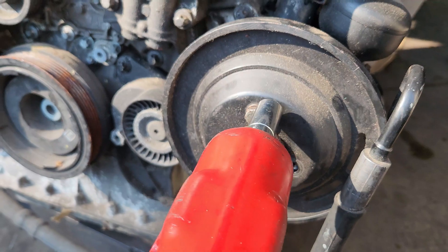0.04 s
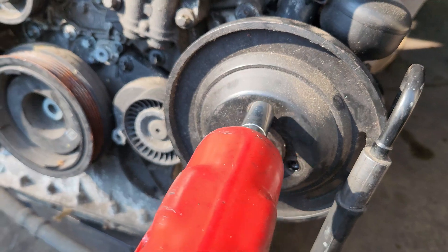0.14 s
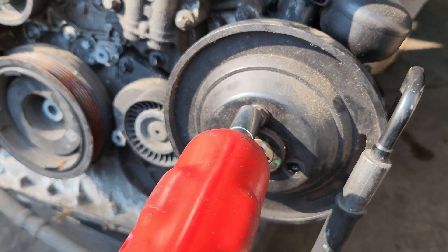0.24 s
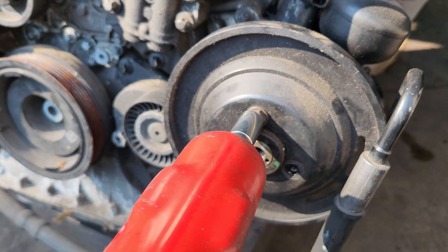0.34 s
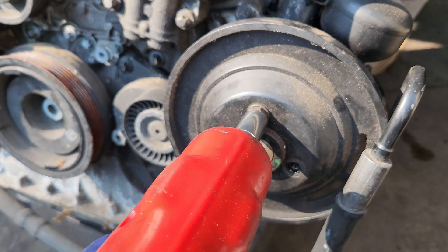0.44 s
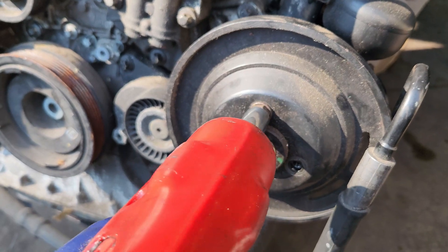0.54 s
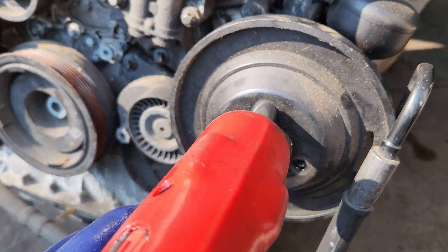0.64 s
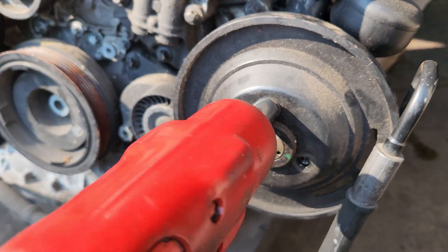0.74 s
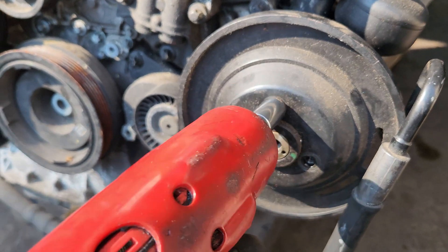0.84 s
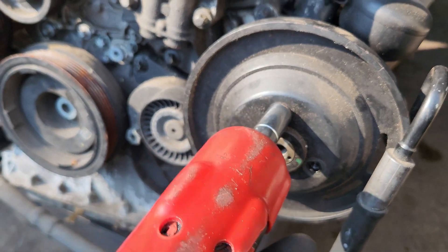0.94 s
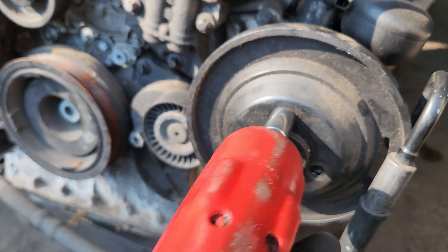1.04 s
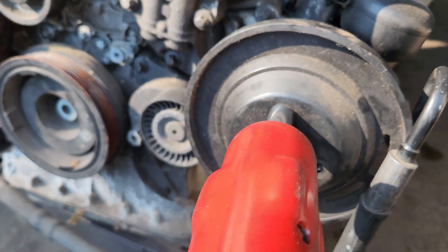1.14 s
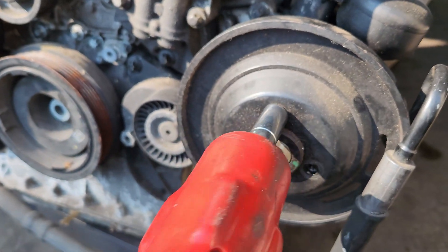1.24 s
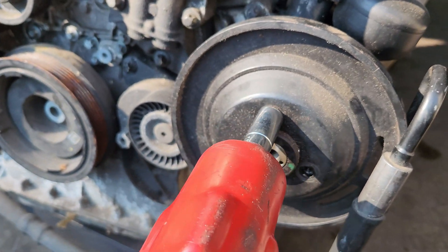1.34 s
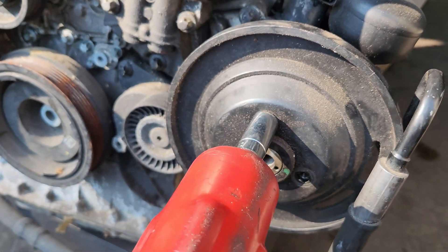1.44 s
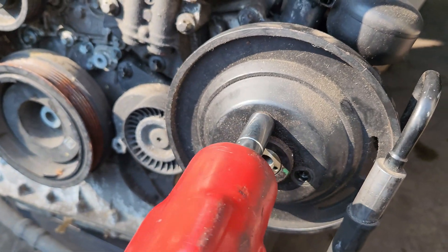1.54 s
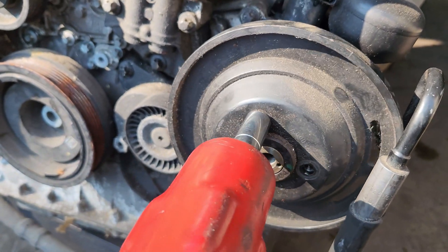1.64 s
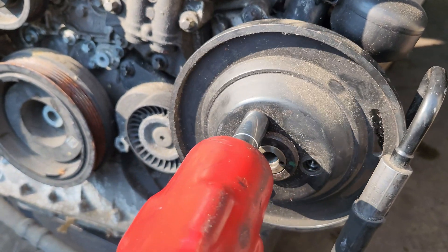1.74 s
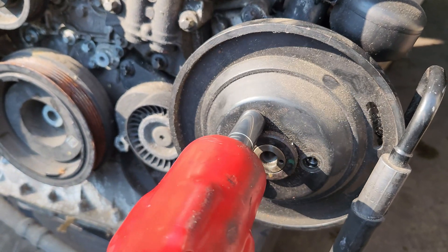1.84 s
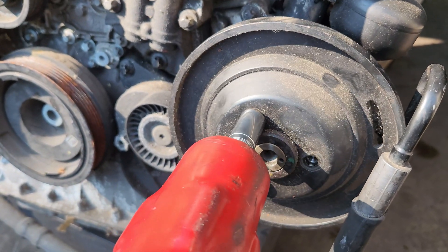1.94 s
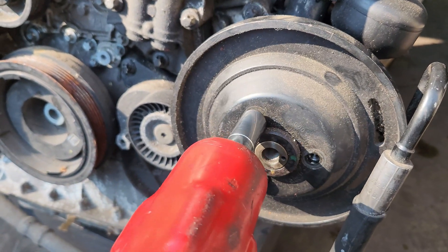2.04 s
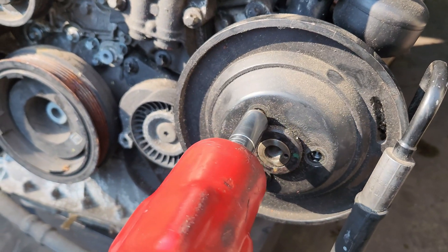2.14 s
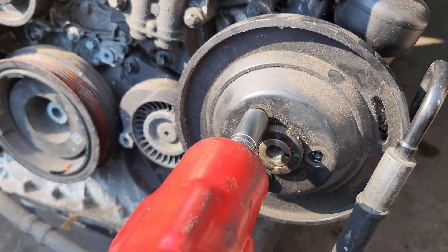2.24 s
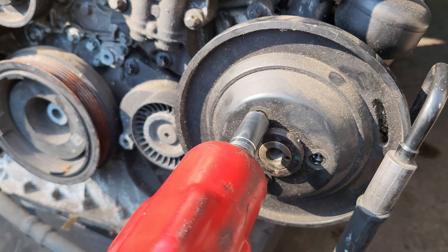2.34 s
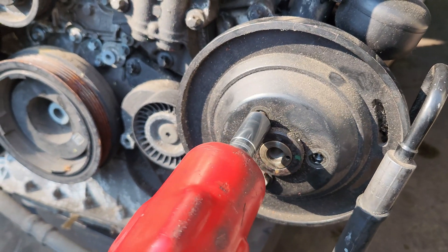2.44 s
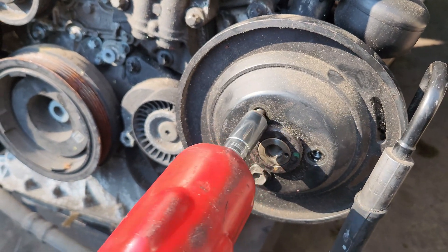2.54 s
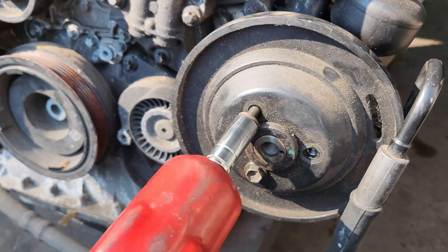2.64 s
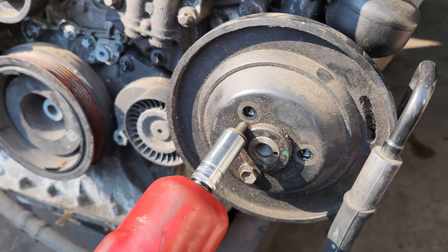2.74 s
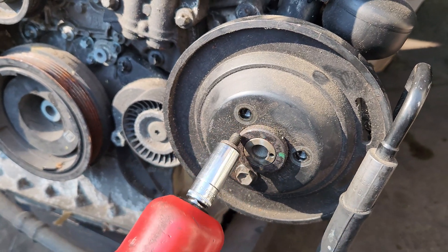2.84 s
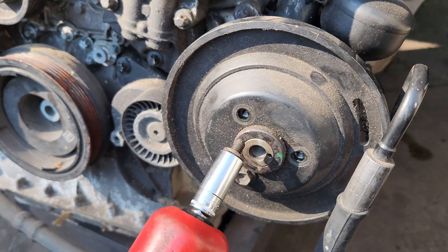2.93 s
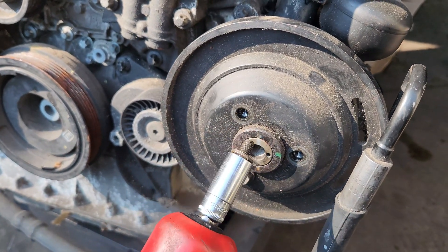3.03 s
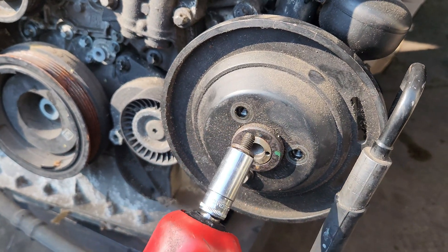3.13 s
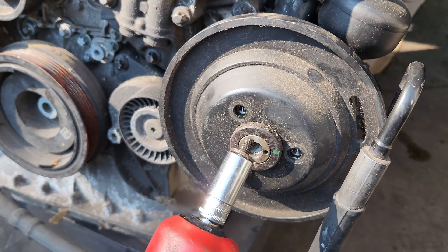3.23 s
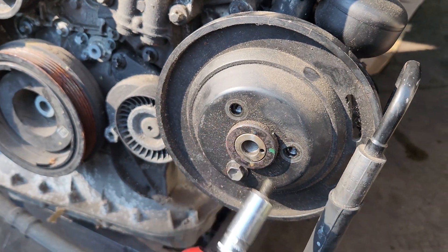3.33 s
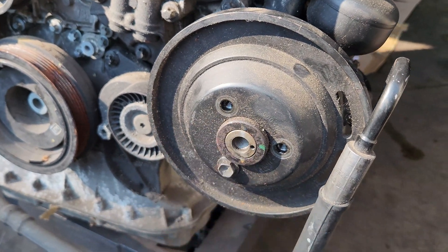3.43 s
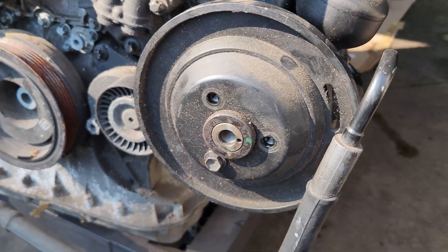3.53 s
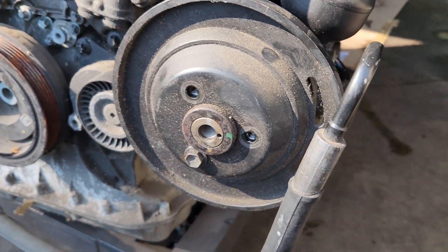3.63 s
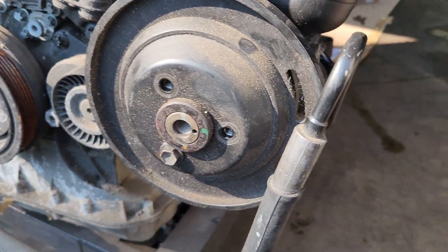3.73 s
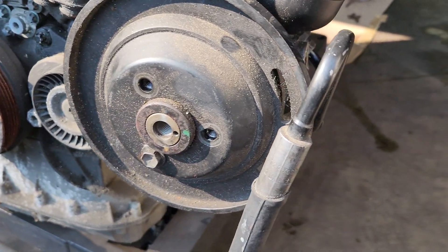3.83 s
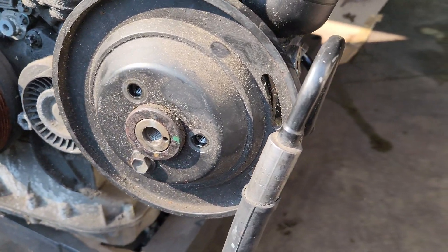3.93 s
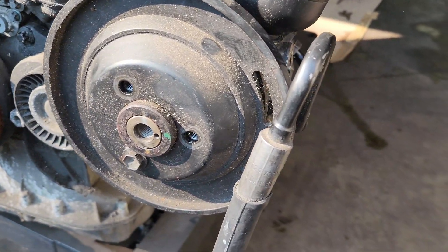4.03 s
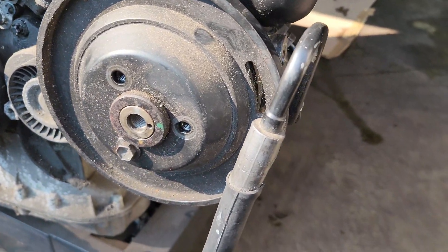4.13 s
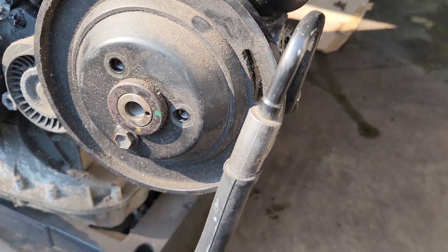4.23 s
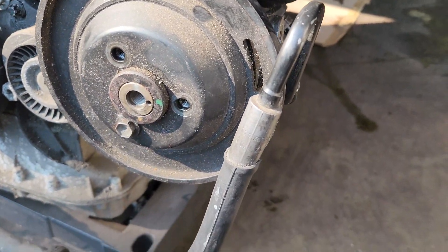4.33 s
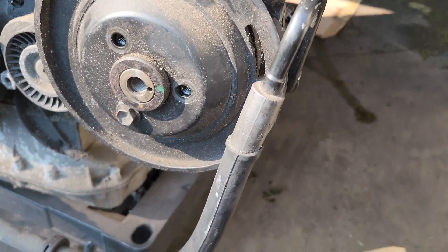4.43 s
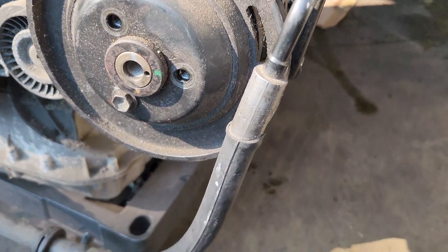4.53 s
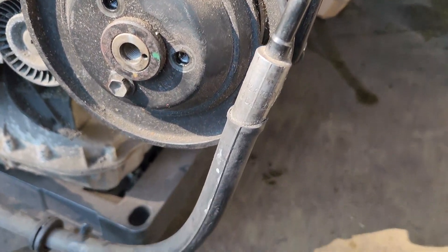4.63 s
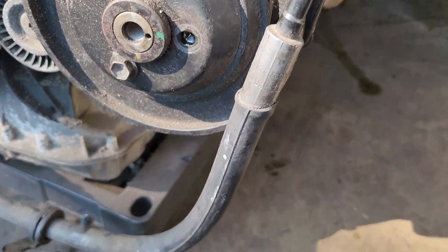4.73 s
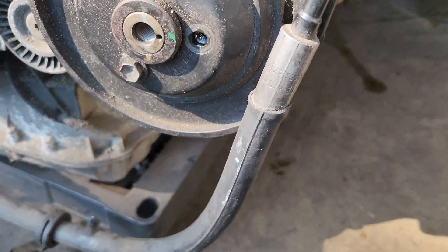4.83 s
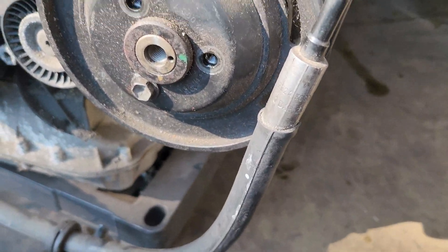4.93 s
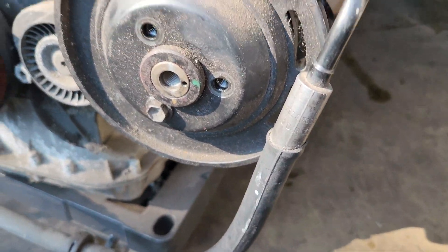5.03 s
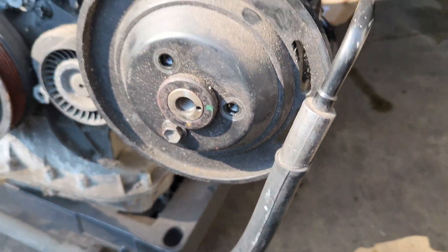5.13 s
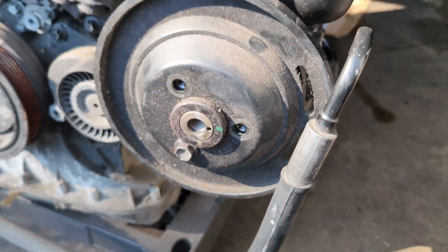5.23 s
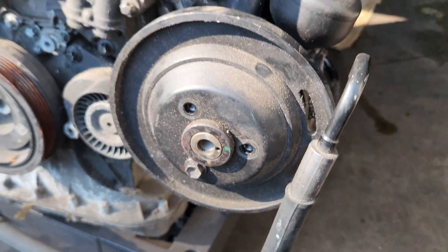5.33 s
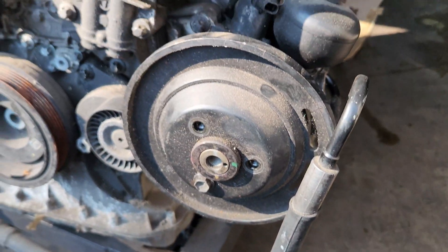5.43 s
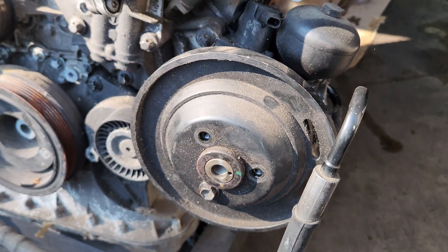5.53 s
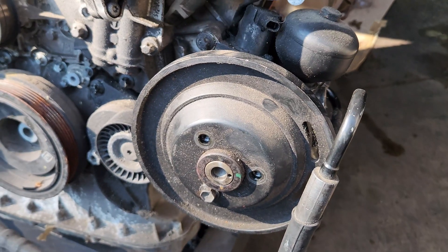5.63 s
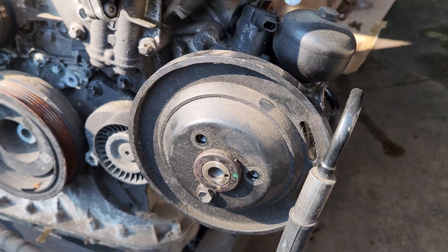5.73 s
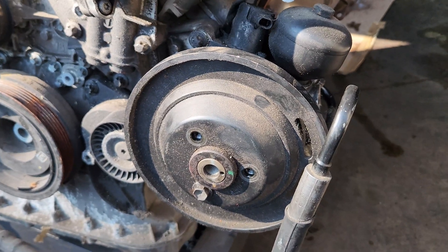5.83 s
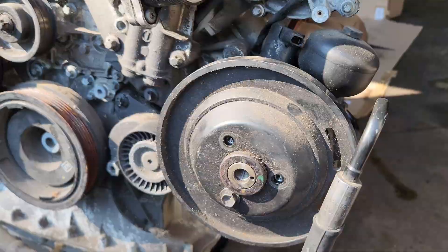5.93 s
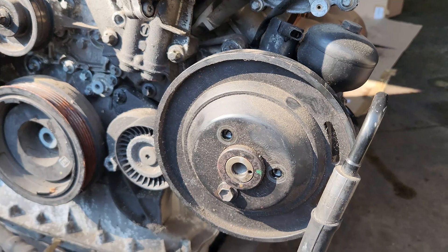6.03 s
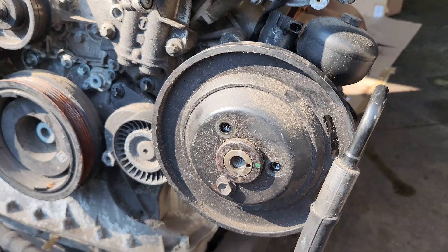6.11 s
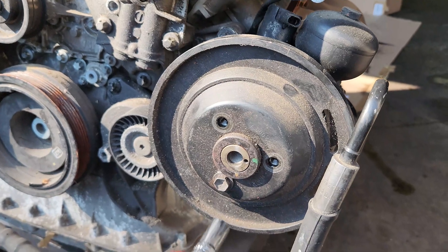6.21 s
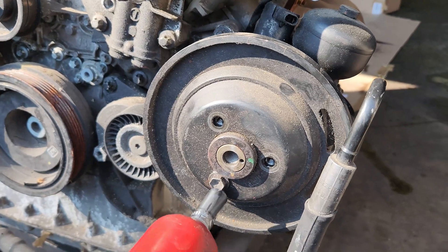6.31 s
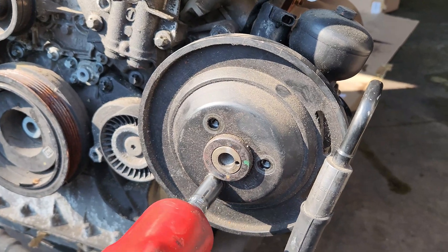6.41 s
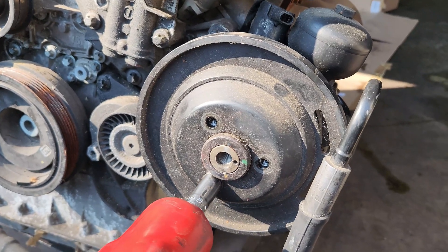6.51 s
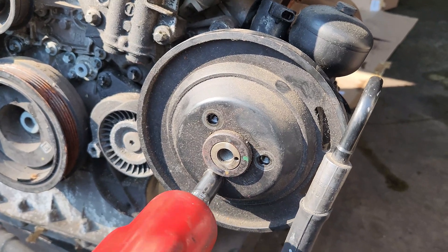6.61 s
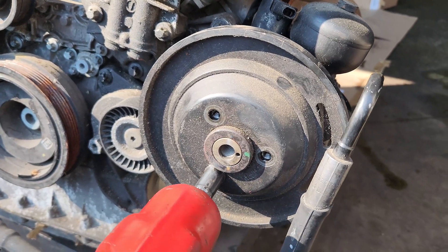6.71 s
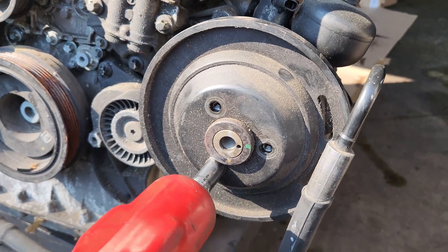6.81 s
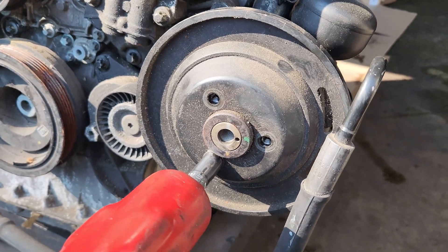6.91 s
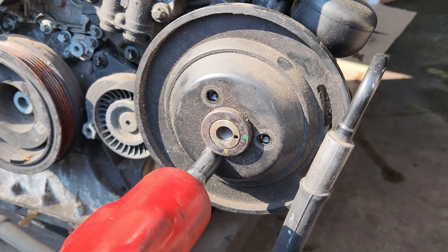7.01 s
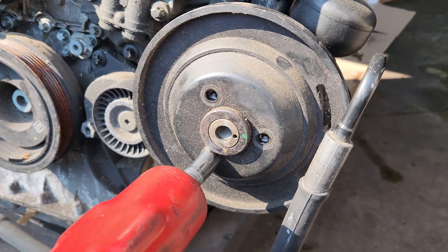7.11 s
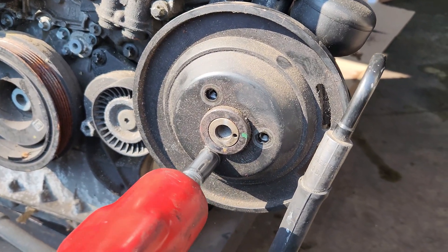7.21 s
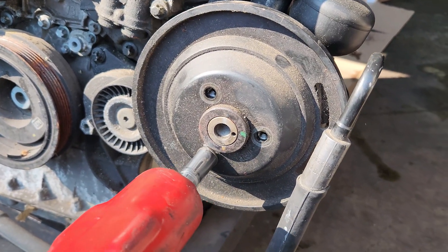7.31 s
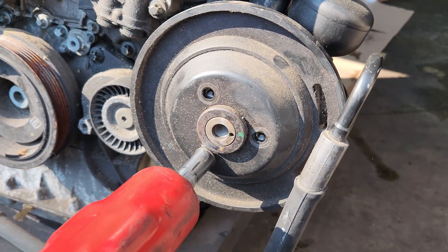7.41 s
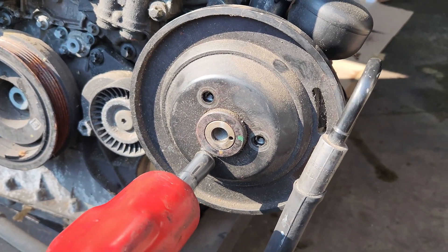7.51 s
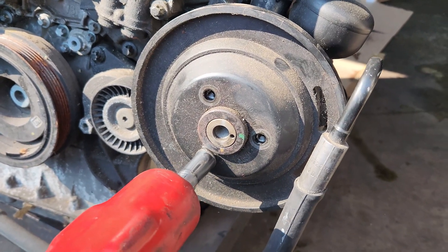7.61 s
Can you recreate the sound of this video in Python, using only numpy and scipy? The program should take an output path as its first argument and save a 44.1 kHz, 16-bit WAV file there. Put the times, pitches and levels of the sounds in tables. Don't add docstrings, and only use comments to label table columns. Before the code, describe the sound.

A workshop with low distant machine rumble, faint hum and hiss, heard an arm's length from an impact wrench, slightly nearer the left. From 0 to 1.3 s the socket makes irregular dry steel taps on a bolt, firmer at 0.35, 0.7, 0.87 and 1.1. At 1.5 s the motor growls and loud, rapid hammer blows crack and ring until about 1.95. The bolt frees; gears whine upward with whirr, fan hiss and small knocks, then pitch falls and brakes with two clacks near 2.87. Quiet follows. Faint handling at 3.7, then a bolt clatters into a metal tray from 4.1 to 4.5, hardest at 4.4, with short scrapes at 4.6 and 5.0 and a light sleeve rustle. At 6.42-6.49 the socket knocks sharply onto the next bolt. At 7.07 a second run starts with dense clatter, rising to a bright, breathy whine that is cut off still running at 7.66.

```python
import sys
import numpy as np
from scipy import signal
from scipy.fft import rfft, irfft, next_fast_len
from scipy.io import wavfile
from scipy.ndimage import uniform_filter1d, map_coordinates

SR = 44100
rng = np.random.default_rng(int(sys.argv[2]) if len(sys.argv) > 2 else 0)


def transcribe(u):
    v = np.clip(np.atleast_2d(u).T, -1, 1)
    q = np.round(v * 32767).astype(np.int16)
    wavfile.write(sys.argv[1], SR, q)


def natural_amplitude(level_db):
    exponent = np.asarray(level_db, float) / 20
    return 10 ** exponent


N = 337806

TOP_HZ = 15870
# [f/Hz, density/dB]
FAN_HISS = [(4100, -32), (8300, -6), (9400, -9), (10650, -8), (11200, 2), (15700, 2.96), (TOP_HZ, -120)]
# [f/Hz, density/dB]
STEEL_CRACK = [(530, -20.5), (900, -14.5), (1020, -7.5), (1750, -13.5), (2140, 0.5), (2460, -3), (2930, -1),
               (3960, -5.5), (4890, -5.5), (6820, -11), (10000, -27.5), (13000, -44.5), (22000, -120)]
# [f/Hz, width/Hz, level/dB]
TOOL_BODY = [(632, 74, 9), (979, 140, 1), (1450, 140, 3)]
# [t/s, mesh/Hz]
FIRST_SPEED = [(1.93, 2000), (1.975, 2400), (2.055, 2785), (2.16, 2810), (2.24, 2882), (2.655, 2992),
               (2.72, 2837), (2.84, 2382), (2.875, 1904)]
SECOND_SPEED = [(7.11, 1945), (7.16, 2610), (7.188, 2677), (7.207, 2828), (7.33, 2875), (7.38, 2938),
                (7.54, 2997), (7.66, 2993)]


def unit(x):
    return x / np.sqrt(np.mean(x ** 2) + 1e-20)


def along(points, hz):
    f, v = np.transpose(points)
    return np.interp(np.log(hz + 1), np.log(f + 1), v)


def curves(rows, off=None):
    s, *cols = np.transpose(rows)
    return [np.interp(np.arange(N) / SR, s, c, off, off) for c in cols]


def wobble(rate):
    coarse = np.arange(0, N + 8, 8)
    knots = rng.standard_normal(int(N * rate / SR) + 4)
    return np.interp(np.arange(N), coarse, map_coordinates(knots, [coarse * rate / SR]))


def filtered(x, response):
    m = next_fast_len(N + SR // 2)
    return irfft(rfft(x, m) * response(np.fft.rfftfreq(m, 1 / SR)), m)[..., :N]


def causal(spectrum):
    level_db = np.maximum(along(spectrum, np.fft.rfftfreq(2048, 1 / SR)), -60)
    cepstrum = irfft(np.log(natural_amplitude(level_db)))
    cepstrum[1:1024] *= 2
    cepstrum[1025:] = 0
    h = irfft(np.exp(rfft(cepstrum)))[None, :1024]
    return h / np.linalg.norm(h)


def resonant(x, modes):
    def response(f):
        return sum((-1) ** k * natural_amplitude(db) * 1j * f * w / (c * c - f * f + 1j * f * w)
                   for k, (c, w, db) in enumerate(modes))
    return filtered(x, response)


def pair(spectrum, alike):
    def mid_side(hz):
        turn = np.arccos(np.clip(along(alike, hz), -1, 1)) / 2
        return natural_amplitude(along(spectrum, hz)) * [np.cos(turn), np.sin(turn)]
    mid, side = filtered(rng.standard_normal((2, N)), mid_side)
    return unit(np.array([mid + side, mid - side]))


def ringing(modes, t):
    return sum(natural_amplitude(db + rng.normal(0, 2) - 60 * t / t60) * np.sin(2 * np.pi * hz * t) for hz, db, t60 in modes)


def workshop():
    # [t/s, level/dB]
    shop_swell = [(0, 2.5), (1.0, 5.5), (1.45, 2.5), (2.9, -2.5), (3.3, -3), (3.95, 2.5), (5.0, -1.5),
                  (5.9, -3), (6.05, 3.5), (6.9, 5), (7.66, 1)]
    # [level/dB, share of the swell]
    layers = [
        (-39.5, 0.24),
        (-55.5, 1.1),
        (-58, 0.77),
        (-85, .3),
    ]
    # [f/Hz, density/dB]
    rumble = [(12, -46.5), (20, -27.5), (33, -9), (54, 2.5), (87, -3.5), (119, -6.5), (161, -14),
              (220, -24), (290, -41.5), (480, -120)]
    hum = [(94, -43.5), (160, -3), (324, 3.5), (410, -5.5), (451, -15.5), (520, -17.5), (680, -67.5),
           (1140, -120)]
    hiss = [(250, -23), (430, -8.5), (524, -0.5), (590, -2), (820, 0), (1600, -5), (2060, -2.5), (2650, -7),
            (3440, -8), (7390, -13), (10000, -28.5), (13000, -58), (22000, -120)]
    air = [(5590, -37), (9500, -10), (11400, 1.07), (15700, -4.5), (TOP_HZ, -120)]
    # [f/Hz, likeness]
    far_alike = [(60, 0.99), (150, 0.97), (380, 0.91), (950, -0.21), (2380, 0.087), (5980, -0.041),
                 (15000, -0.16)]
    # [loudest t/s, level/dB, rise/(dB/s), fall/(dB/s)]
    rustles = [
        (1.0, -70.5, 65, 23),
        (3.679, -71.5, 41, 68),
        (4.45, -50.5, 86.5, 70),
        (5.6, -74.5, 16, 41),
        (6.36, -63, 49, 87),
        (6.8, -76, 47, 64),
    ]
    swell, = curves(shop_swell)
    t = np.arange(N) / SR
    rustle_db = np.max([db - np.abs(t - s) * np.where(t < s, rise, fall) for s, db, rise, fall in rustles], axis=0)
    gains = [natural_amplitude(db + share * swell) for db, share in layers]
    gains[2] = np.hypot(gains[2], natural_amplitude(-9.5 + 0.63 * rustle_db))
    gains[3] = np.hypot(gains[3], natural_amplitude(rustle_db))
    depths_db = (0.73, 1.1, 1.2, 1.2)
    return sum(gain * natural_amplitude(depth * wobble(5)) * pair(spectrum, far_alike)
               for gain, spectrum, depth in zip(gains, (rumble, hum, hiss, air), depths_db))


def walls(x):
    # [f/Hz, t60/s]
    room_decay = [(200, 0.4), (2000, 0.32), (10000, 0.078)]
    hz, t, z = signal.stft(rng.standard_normal((2, SR // 2)), SR, nperseg=256)
    fading = z * natural_amplitude(-60 * t / along(room_decay, hz)[:, None])
    tail = signal.istft(fading, SR, nperseg=256)[1]
    return signal.oaconvolve(x, tail / np.linalg.norm(tail[0]), axes=1)[:, :N]


def scrapes():
    # [middle t/s, half length/s, level/dB]
    slides = [
        (4.594, 0.046, -37.5),
        (4.983, .01, -39),
        (5.01, 0.022, -37),
        (5.045, .015, -39),
    ]
    # [f/Hz, width/Hz, level/dB]
    slide_modes = [(870, 106, 6), (3430, 700, -4)]
    t = np.arange(N) / SR
    stroke = sum(natural_amplitude(db) * np.exp(-((t - s) / half) ** 2) for s, half, db in slides)
    return resonant(stroke * rng.standard_normal((2, N)), slide_modes)


def contacts(events, crack, body, thud_db, alike, click):
    # [f/Hz, density/dB]
    fizz_colour = [(5000, -40.5), (8500, 0), (11000, -3), (12400, 1), (15200, 0.5), (16000, -29),
                   (16500, -49.5)]
    t = np.arange(SR // 9) / SR
    burst = np.zeros((3, 2, N + len(t)))
    for s, db, low_db, high_db, t60, *pan in events:
        lumps = rng.standard_normal(len(t) // 35).repeat(35)
        grit = rng.standard_normal((4, len(t))) * natural_amplitude(2.6 * lumps)
        life = np.clip(t60, .004, .12)
        fall = natural_amplitude(-60 * t / life) * (1 - np.exp(-t / (0.053 * life)))
        grit = grit * np.linalg.norm(fall) / np.linalg.norm(fall * grit, axis=1, keepdims=True)
        sides = natural_amplitude(db + sum(pan) * np.array([[.5], [-.5]]))
        both = alike * grit[0] + np.sqrt(1 - min(alike, 1) ** 2) * grit[1:3]
        both[:, 32] += click * np.linalg.norm(fall) / fall[32]
        start = round(s * SR) - 30
        at = slice(start, start + len(t))
        burst[0, :, at] += sides * natural_amplitude(-0.5) * (fall ** 2 + 0.19 * fall ** 0.37) * both
        burst[1, :, at] += natural_amplitude(db + low_db + thud_db) * fall * grit[3]
        burst[2, :, at] += sides * natural_amplitude(high_db + 2.0) * fall ** 0.74 * both
    sharp = signal.oaconvolve(burst[0], causal(crack), axes=1)[:, :N]
    fizz = signal.oaconvolve(burst[2], causal(fizz_colour), axes=1)[:, :N]
    return sharp + resonant(burst[1], body) + fizz


def pings(rows):
    t, out = np.arange(SR // 25) / SR, np.zeros(N + SR)
    t60, rise_s = 0.014, .0002
    fall = natural_amplitude(-5.5 - 60 * t / t60) * (1 - np.exp(-t / rise_s))
    for s, db, low_hz, high_hz, high_db in rows:
        partials = np.sin(2 * np.pi * low_hz * t) + natural_amplitude(high_db) * np.sin(2 * np.pi * high_hz * t)
        out[round(s * SR):][:len(t)] += natural_amplitude(db) * fall * partials
    return out[:N]


def bolt_in_tray():
    # [t/s, peak/dB, thud/dB, fizz/dB]
    tray_hits = [(3.662, -44.5, 0.5, -31), (3.741, -32.5, -13, -29), (4.09, -24, -18, -19),
                 (4.098, -18, -17, -17), (4.2234, -24, -12, -30), (4.228, -15, -15, -23),
                 (4.256, -16, -9, -27), (4.28, -20.5, -9, -21), (4.321, -26, -8, -29),
                 (4.354, -14, -10, -22), (4.37, -15.5, -20, -15.5), (4.4, -3.5, -20, -18),
                 (4.41, -20, -10.5, -24), (4.473, -14, -17, -27), (4.757, -36.5, -21, -38),
                 (5.021, -27.5, -18, -29), (5.063, -30, -16, -22), (5.075, -31.5, -9, -17),
                 (5.096, -36, -17, -22), (5.874, -41.5, -15, -55)]
    # [f/Hz, density/dB]
    tray_crack = [(350, -27), (600, -12), (906, -14.5), (1170, -7.5), (1690, -2.5), (3900, -6), (4180, -2),
                  (6860, -12), (7630, -8), (10000, -43.5), (13000, -46), (22000, -120)]
    # [f/Hz, width/Hz, level/dB]
    tray_body = [(111, 70, 2), (184, 59, 6.5), (437, 82, -0.5), (840, 154, -4.5)]
    # [t/s, peak/dB, low/Hz, high/Hz,
    # high over low/dB]
    bolt_partials = [(3.742, -34.5, 3330, 4000, 4), (4.099, -13.5, 2450, 3920, -9),
                     (4.2278, -16, 2350, 4870, -3), (4.2573, -15.5, 2640, 4830, -8),
                     (4.2817, -19, 1420, 5000, -7), (4.3221, -28, 1960, 4040, -6),
                     (4.3547, -4, 2290, 7490, -22), (4.3704, -19, 2400, 5360, -13),
                     (4.4002, -7.5, 1630, 4300, 4), (4.475, -12, 2800, 6360, -3),
                     (4.7586, -39, 2060, 4100, -3), (5.0205, -33, 2770, 3760, 0),
                     (5.0627, -34, 1180, 6300, 8), (5.0745, -28, 3600, 3860, -2),
                     (5.0963, -36, 3520, 7400, 6), (5.875, -26, 2180, 3980, -17),
                     (4.354, -7, 1600, 770, -8),
        (4.4008, -9.5, 2990, 7600, -7.5),
        (4.0993, -19, 1500, 920, -6),
    ]
    t60, faint_db, rightward = 0.029, -1.5, 0.12
    events = [(*row, t60, rightward * min(row[1] - faint_db, 0)) for row in tray_hits]
    hits = contacts(events, tray_crack, tray_body, thud_db=24.0, alike=0.31, click=0.43)
    return hits + pings(bolt_partials)


def pulley():
    # [t/s, rim/dB, hub/dB]
    ringing_taps = [
        (.344, -41, -70),
        (.464, -60, -72),
        (1.083, -53, -70),
        (6.42, -52, -38),
        (6.477, -46, -26),
    ]
    # [t/s, low ring/dB, high ring/dB]
    ringing_blows = [(1.5565, -42, -46), (1.6366, -32, -40), (1.6529, -36, -40), (1.719, -33, -25),
                     (1.7362, -38, -30), (1.7853, -36, -38), (1.7997, -38, -29), (1.8368, -36, -31),
                     (1.8511, -38, -35), (1.9001, -44, -44)]
    # [f/Hz, level/dB, t60/s]
    rim = [(3792, 1, 0.22)]
    hub = [(743, -19, 0.4), (1534, -16, 0.09), (2482, 1, 0.075), (3042, -2, 0.085), (6029, -21, 0.32)]
    # [f/Hz, level/dB, t60/s]
    socket_modes = [
        [(9012, -3, .16)],
        [(12110, 4, .06)],
    ]
    socket_partners = [
        [(8885, -1, .13)],
        [(12480, 0, .05)],
    ]
    t, out = np.arange(SR // 3) / SR, np.zeros((2, N))
    parts = ((ringing_taps, (rim, hub), .7), (ringing_blows, socket_modes, 1), (ringing_blows, socket_partners, -.4))
    for rows, (one, two), right in parts:
        for s, one_db, two_db in rows:
            ring = natural_amplitude(one_db) * ringing(one, t) + natural_amplitude(two_db) * ringing(two, t)
            out[:, round(s * SR):][:, :len(t)] += [[1], [right]] * ring
    return out


def gear_case():
    # [f/Hz, level/dB, t60/s]
    case_modes = [(641, 0, 0.04), (1038, 6.5, 0.0245)]
    # [t/s, low mode/dB, high mode over it/dB]
    case_hits = [(.3445, -17, -10), (.3994, -36, -12), (.688, -31, 0), (.874, -45, 0), (1.0822, -17.5, 0),
                 (1.636, -18.5, 0), (1.72, -20, 0), (1.786, -24, 0), (1.839, -21.5, 0), (1.901, -20.5, -6),
                 (6.4234, -30, -8)]
    t, out = np.arange(SR // 10) / SR, np.zeros(N)
    for s, db, high_db in case_hits:
        ring = ringing(case_modes[:1], t) + natural_amplitude(high_db) * ringing(case_modes[1:], t)
        out[round(s * SR):][:len(t)] += natural_amplitude(db) * ring
    return out


def tool_contacts():
    # [t/s, peak/dB, thud/dB, fizz/dB]
    taps = [(0.0475, -28.5, -14.5, -42), (0.0574, -31, -14, -25), (0.3445, -15, -3.5, -21),
            (0.3694, -43, -1.5, -31), (0.3994, -41, 2, -32.5), (0.4628, -27, -7.5, -47),
            (0.6174, -48, 9, -31), (0.688, -23.5, -4, -55), (0.7046, -30, -7, -38),
            (0.8264, -49.5, 7.5, -23), (0.853, -34.5, 3.5, -30), (0.8638, -23, -11.5, -19),
            (0.8743, -22.5, -5.5, -25), (0.9098, -37, 0, -30), (0.9734, -43.5, 5, -24),
            (1.0822, -19, 4, -49), (1.1376, -24.5, -13.5, -28), (1.177, -35, -6.5, -30),
            (1.3024, -37, -4, -37)]
    reseat = [
        (6.4188, -16.5, -8, -21),
        (6.4234, -14.5, -3.5, -26),
        (6.4448, -28, -8, -25),
        (6.4525, -20.5, -10, -23),
        (6.4762, -13.5, -12, -25),
        (6.4854, -22.5, -6, -34),
        (6.8179, -40, 6.5, -30),
    ]
    clatter = [(2.8519, -13.5, -13, -23), (2.8842, -13, -15.5, -10), (2.933, -39, -7.5, -28.5),
               (7.0675, -25, -10, -25), (7.0735, -22, -10, -25), (7.0888, -6.5, -15, -21),
               (7.097, -15, -14, -20), (7.108, -11.5, -22, -30.5), (7.1145, -12, -22, -34),
               (7.1275, -14, -20.5, -28), (7.143, -7.5, -17, -28.5), (7.1222, 0, -22.5, -40),
               (7.134, -6, -20, -20), (7.1526, -6.5, -15, -29.5), (7.1555, -9, -15, -28),
               (7.1654, -8.5, -15.5, -22), (7.1854, -8, -20, -28), (2.669, -25, -19, -19),
               (2.764, -23, -20.5, -23.5), (7.219, -15.5, -25, -25), (7.362, -20.5, -26.5, -2),
               (7.398, -19, -27, 1), (7.502, -20.5, -27, -2), (7.5359, -14.5, -24, -3.5)]
    # [t/s, peak/dB, low/Hz, high/Hz, high over low/dB]
    tool_partials = [(0.3426, -13, 2050, 4940, -8), (0.4628, -27, 1280, 4730, -3),
                     (0.6878, -15, 2130, 4640, -8), (0.8649, -30, 3760, 4910, 2),
                     (0.8714, -20, 2080, 4900, -2), (1.0831, -13.5, 1260, 4360, -9),
                     (1.1378, -34, 2970, 4370, -11), (1.5559, -8, 3030, 5430, 0),
                     (1.5881, -2, 1300, 4930, -20), (1.6337, -3, 3200, 4270, 2),
                     (1.6527, -8, 1200, 5900, 1), (1.6791, -7, 2140, 4790, -5), (1.719, -8, 3000, 4770, 0),
                     (1.7358, -6, 1620, 5030, 2), (1.7549, -3, 2230, 4100, -3),
                     (1.786, -11, 3160, 4730, -6), (1.7993, -2, 3500, 4940, -3),
                     (1.8362, -3, 2100, 4900, -7), (1.852, -6, 2800, 4410, -1),
                     (1.8696, -8, 1420, 4830, -9), (1.9001, -2, 2020, 5470, -10),
                     (1.9265, -10, 3730, 4700, -3), (1.94, -8, 3920, 4110, -3),
                     (1.9589, -10, 2170, 4400, 0), (2.8525, -14, 2080, 4730, 0),
                     (2.8833, -13.5, 1418, 5280, 2.5), (6.4177, -15.5, 1350, 7400, 4),
                     (6.4443, -20, 3124, 7600, -2), (6.4514, -27, 2420, 4120, -3),
                     (6.4765, -14.5, 3200, 7540, -2), (6.4844, -23, 2540, 6020, -2),
                     (7.0707, -25, 4000, 4000, -3), (7.0878, -13, 3350, 4920, -3),
                     (7.1207, 0, 2450, 3930, -7), (7.1348, 1, 3820, 4030, 1), (7.151, -7, 2460, 4280, -1),
                     (7.165, -4, 3150, 4660, 1)]
    kinds = ((taps, 0.026), (reseat, 0.021), (clatter, 0.021))
    events = [(*row, t60) for rows, t60 in kinds for row in rows]
    hits = contacts(events, STEEL_CRACK, TOOL_BODY, thud_db=15.5, alike=0.26, click=0.55)
    return hits + gear_case() + pings(tool_partials)


def anvil():
    # [t/s, peak/dB]
    knocks = [(2.05, -37), (2.084, -33), (2.122, -35), (2.156, -34), (2.203, -35), (2.238, -37),
              (2.274, -34), (2.312, -29), (2.347, -27.5), (2.381, -33), (2.417, -34), (2.453, -33),
              (2.505, -35), (2.547, -34), (2.635, -37)] + [(7.206 + .036 * k, -32.5) for k in range(8)]
    # [f/Hz, width/Hz, level/dB]
    anvil_modes = [(636, 150, 0), (960, 110, 9), (2110, 150, 6)]
    t, push = np.arange(SR // 100) / SR, np.zeros(N + SR)
    for s, db in knocks:
        knock = unit(natural_amplitude(-60 * t / .011) * rng.standard_normal(len(t)))
        push[round(s * SR):][:len(t)] += natural_amplitude(db + 10) * knock
    hiss = filtered(push[:N], lambda hz: natural_amplitude(along(FAN_HISS, hz)))
    return resonant(push[:N], anvil_modes) + natural_amplitude(-25.0) * hiss


def hammer():
    # [t/s, peak/dB, fizz/dB]
    hammer_blows = [(1.5157, -20.5, -35.5), (1.5565, 2.5, -23), (1.5888, -1, -40.5), (1.6328, -4, -23.5),
                    (1.6366, 0.5, -15), (1.6413, -10, -11), (1.6474, -6.5, -17.5), (1.6529, 2, -16),
                    (1.6791, -8.5, -19.5), (1.719, 1, -17), (1.7252, -4, -5), (1.7362, -1.5, -13),
                    (1.7554, -6, -16), (1.7853, -4.5, -13), (1.7914, -10.5, -22), (1.7997, -1, -11.5),
                    (1.8142, -12, -30.5), (1.826, -10.5, -27), (1.8368, -1, -11.5), (1.8434, -6.5, -27.5),
                    (1.8511, -5, -12), (1.8694, -10, -28.5), (1.9001, -3, -16), (1.9071, -4, -25.5),
                    (1.9261, -9, -20.5), (1.9395, -8.5, -20), (1.9589, -11.5, -33.5)]
    turns_s = FIRST_SPEED[0][0] - .015
    events = []
    for s, db, fizz_db in hammer_blows:
        low_db = -15.5 - 0.22 * db - 9 * (s > turns_s)
        events.append((s, db, low_db, fizz_db, .018))
    return contacts(events, STEEL_CRACK, TOOL_BODY, thud_db=17.5, alike=0.53, click=0.55)


def trigger(run, rows, loaded_hz):
    pull, stop, whirr_db, drone_db, fan_db = run
    attack_s, brake_s, brake_db = 0.041, 0.023, 15.5
    spin_up_s, spin_up_db, top_speed_hz = .05, 12.5, 2906
    t = np.arange(N) / SR
    since, after = np.clip(t - pull, 0, 9), np.clip(t - stop, 0, 9)
    attack_db = 40 * np.log10(np.clip(since / attack_s, 1e-3, 1))
    held = attack_db - brake_db * (1 - np.exp(-after / brake_s)) - 150 * after
    speed_hz = uniform_filter1d(np.where(t < rows[0][0] - .05, loaded_hz, curves(rows)[0]), size=3000)
    speed_db = 20 * np.log10(speed_hz / top_speed_hz)
    surge_s, surge_fall_s = 1.503, 0.047
    surge = 11.5 * np.exp(-np.abs(t - surge_s) / np.where(t < surge_s, .01, surge_fall_s))
    load = 11.5 / (1 + np.exp(np.clip((t - 1.95) / 0.0092, -50, 50)))
    return (held + whirr_db + surge,
            held + drone_db + 1.7 * speed_db + load,
            held + fan_db + 4.2 * speed_db - spin_up_db * np.exp(-since / spin_up_s))


def motor():
    # [pull t/s, stop t/s, whirr/dB, drone/dB, fan at full speed/dB]
    runs = [
        (1.515, 2.862, -30.5, -40, -38.5),
        (7.066, 8, -25, -34.5, -32),
    ]
    # [f/Hz, density/dB]
    whirr_colour = [(700, -32.5), (1200, -14), (1500, -6), (1840, -12), (2150, -1.5), (3000, -2),
                    (4000, -4.5), (5100, -3.5), (6300, -7), (7600, -8.5), (8600, -12.5), (10000, -47.5),
                    (13600, -60), (22000, -120)]
    drone_colour = [(110, -5), (180, -4), (378, -4), (452, -18), (545, -3.5), (658, 2.5), (1010, -5),
                    (1150, -6.5), (1700, -10.5), (2210, -57), (3740, -120)]
    vent_colour = [(5500, -53), (6700, -19), (7250, -13), (7700, -13), (8600, -59)]
    first = trigger(runs[0], FIRST_SPEED, 2487)
    second = trigger(runs[1], SECOND_SPEED, SECOND_SPEED[0][1])
    whirr_db, drone_db, fan_db = np.maximum(first, second)
    slack = wobble(60)
    near = [(300, 0.98), (1000, 1.0), (4000, 0.15), (12000, 0.076)]  # (Hz, likeness of the two ports)
    whirr = natural_amplitude(whirr_db) * unit(natural_amplitude(.8 * slack + 2.2 * wobble(500)) * pair(whirr_colour, near))
    drone = natural_amplitude(drone_db) * unit(natural_amplitude(1.5 * slack + .8 * wobble(30)) * pair(drone_colour, near))
    fan = natural_amplitude(fan_db) * unit(natural_amplitude(2.4 * slack + 1.86 * wobble(300)) * pair(FAN_HISS, near))
    facing_db = np.where(np.arange(N) > 5 * SR, 7.5, 2.5)
    vent = natural_amplitude(fan_db + facing_db + 1.5 * wobble(90)) * pair(vent_colour, near)
    return whirr + drone + fan + vent


def whine(rows, ports, burst_s, seated_s):
    multiples = [1, 1.189, 1.765, 2.668, .585]
    pitch_blur = [.0007, .003, .022, .0008, .025]
    flutters = [.8, 2.8, 3, 1, 5]
    # [level/dB], fade in s
    muffles, muffle_fade_s = [-14, -12, -5, 0, -10], .015
    # [mesh/Hz, mesh/dB, second mesh/dB, rattle/dB, rotor whistle/dB]
    casing = [(1970, -41, -41, -29.5, -69), (2220, -31.5, -39, -27.5, -60),
              (2410, -35.5, -34.5, -33, -53.5), (2520, -31.5, -37.5, -35, -38),
              (2600, -31, -36, -34.5, -31), (2730, -43, -36, -31, -29.5), (2810, -38, -33, -28.5, -31.5),
              (2870, -36.5, -40.5, -35.5, -35), (2940, -29.5, -38, -39.5, -35),
              (2990, -28.5, -42, -41.5, -46)]
    teeth = 105
    mesh_hz = uniform_filter1d(curves(rows)[0], size=500)
    speeds, *passed = np.transpose(casing)
    t, gain = np.arange(N) / SR, np.gradient(mesh_hz) * SR
    idle = (t < rows[0][0]) | (t > rows[-1][0])
    mesh, second, rattle, whistle = [np.interp(mesh_hz, speeds, db) - 120 * idle for db in passed]
    turns = np.cumsum(mesh_hz) / SR / teeth
    coast, push = np.clip(-gain / 2500, 0, 1), np.clip(gain / 12000, 0, 1) ** 4
    once_a_turn = np.cos(2 * np.pi * (turns - np.interp(burst_s, t, turns))) - 1
    rattle = rattle - 20 * coast + 11 * np.clip((mesh_hz - 2700) / 220, .2, 1) * once_a_turn
    mesh = mesh + 2 * coast
    second = second + 2.2 * 2 * coast
    slow = second - 17.5 + 8 * coast * np.clip((2800 - mesh_hz) / 250, 0, 1)
    levels = (mesh, second, rattle, whistle, slow)
    out, half = np.zeros((2, N)), np.array([[.5], [-.5]])
    strain = .012 * push + .005 * coast
    lines = zip(levels, multiples, pitch_blur, flutters, muffles, seated_s, ports)
    for db, k, blur, flutter_db, muffle_db, seat_s, (pan, phase, near_db) in lines:
        turn = 2 * np.pi * np.cumsum(mesh_hz * (1 + (blur + strain) * wobble(500))) / SR
        muffled = muffle_db / (1 + np.exp(np.clip((t - seat_s) / muffle_fade_s, -50, 50)))
        unsteady = flutter_db * wobble(90) + muffled
        level = natural_amplitude(db + near_db - 4 * push + unsteady + pan * half)
        out += np.sqrt(2) * level * np.sin(k * turn + phase * half)
    return out


def gear_whine():
    # [left-right/dB, phase/rad, nearness/dB]
    first_ports = [(-13.5, 3, -4), (-7, 4, -6.5), (-6.5, 1.5, -0.5), (6.5, -1.95, 0), (1.5, 1, -4)]
    second_ports = [(-25, 0, -1.5), (-7.5, -1.4, 8), (-3, 1.4, 8), (0.5, 0.5, 6.5), (3.5, 3, 17.5)]
    first = whine(FIRST_SPEED, first_ports, 2.066, [1.9, 1.97, 2.02, 0, 2.7])
    return first + whine(SECOND_SPEED, second_ports, 7.29, [7.27, 7.17, 7.16, 0, 7.3])


def nearer_left(x):
    lead_s = .00017
    tilt = [(500, 1.0), (2500, 0.49), (7000, 0.489)]  # (Hz, dB either way)

    def ports(hz):
        delay = np.exp(1j * np.pi * lead_s * hz * [[1], [-1]])
        return delay * natural_amplitude(along(tilt, hz) * [[1], [-1]])
    return filtered(x, ports)


def scene():
    tool = nearer_left(motor() + tool_contacts() + hammer() + anvil()) + pulley()
    bolt = bolt_in_tray()
    echo = walls(natural_amplitude(-19) * tool + natural_amplitude(-13) * bolt)
    return workshop() + echo + scrapes() + bolt + tool + gear_whine()


def low_pass(x):
    return signal.sosfilt(signal.butter(12, 16820, fs=SR, output="sos"), x)


def record(dry):
    held = dry / (1 + np.abs(dry / 1.05) ** 4) ** (1 / 4)
    mix = filtered(held, lambda hz: np.where(hz > TOP_HZ, natural_amplitude(-13.5), 1))
    return low_pass(mix)


dry = scene()
out = record(dry)
transcribe(out)
```